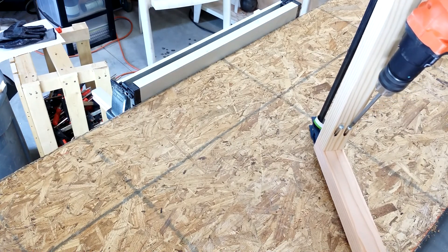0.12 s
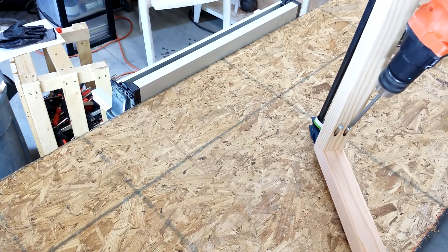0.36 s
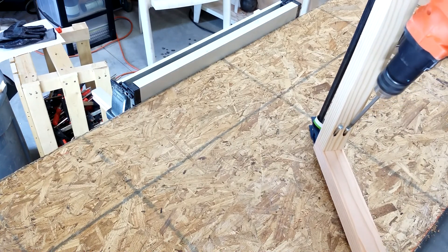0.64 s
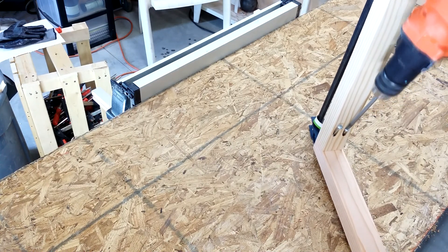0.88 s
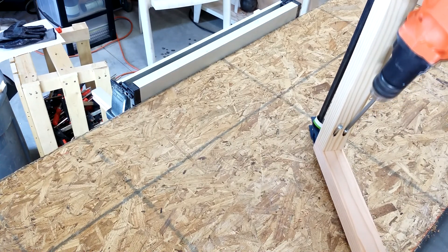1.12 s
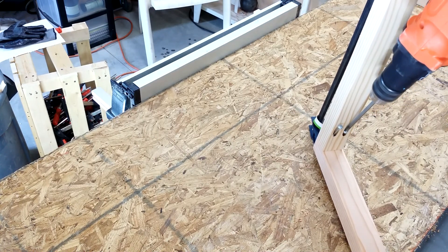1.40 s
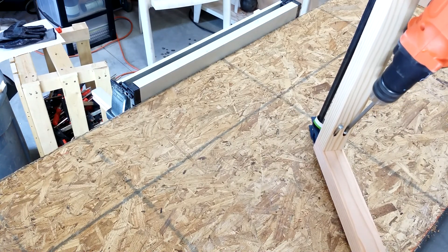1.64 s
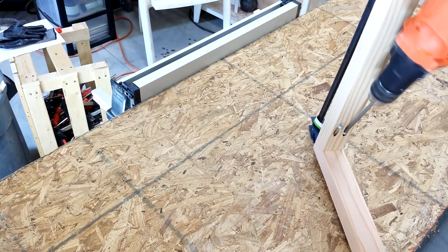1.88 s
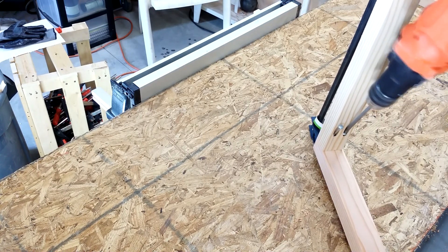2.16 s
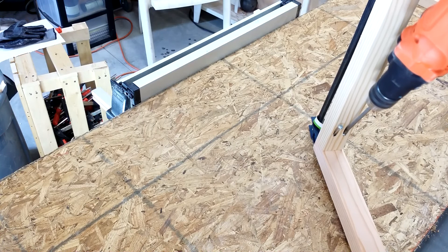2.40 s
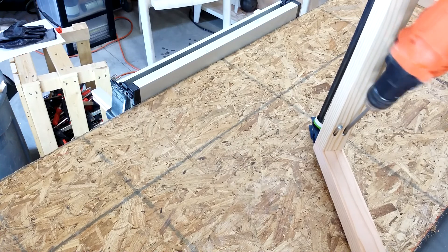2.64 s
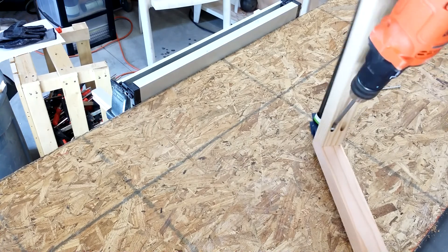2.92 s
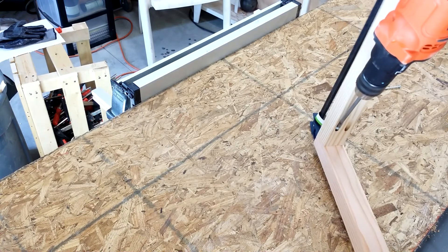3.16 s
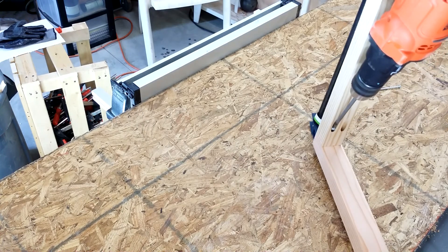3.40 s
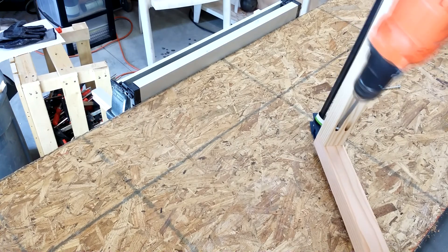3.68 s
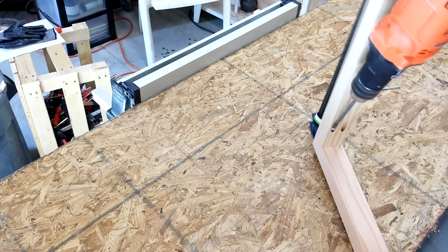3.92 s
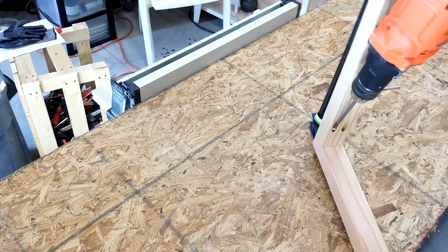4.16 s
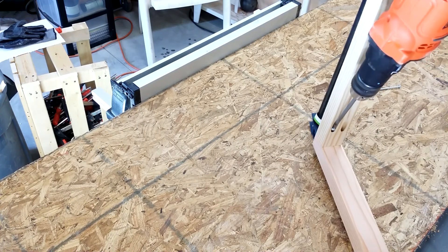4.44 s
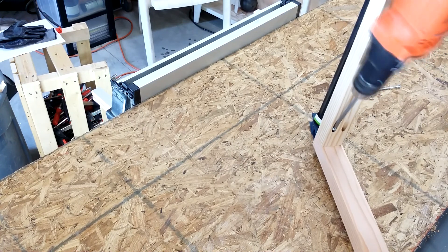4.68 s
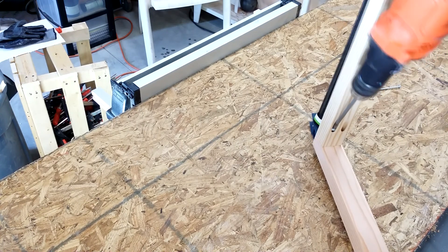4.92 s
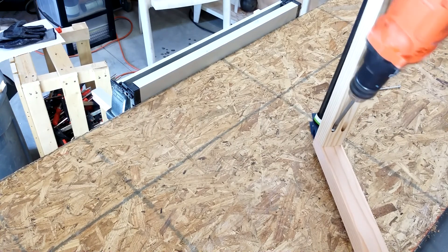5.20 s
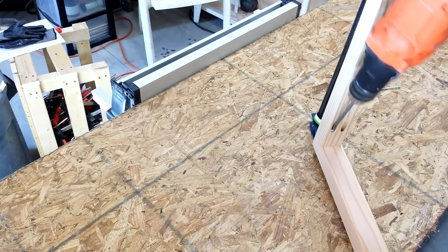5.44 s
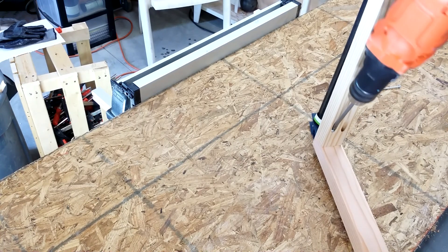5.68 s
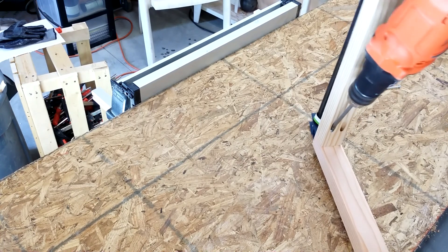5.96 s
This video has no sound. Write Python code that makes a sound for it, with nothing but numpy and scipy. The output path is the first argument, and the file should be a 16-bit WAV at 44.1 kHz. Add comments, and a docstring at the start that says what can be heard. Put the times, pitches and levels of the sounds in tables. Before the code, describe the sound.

A cordless drill is already starting at 0 s, close and to the right, duller on the left. Its grainy rasp and gear whine climb quickly, levelling off around 1 s. The bit slips at about 0.4, 0.7 and 1.4 s: a low thump of the wooden bench, a momentary softening of the gears, then a bright steel click and another thump as it catches. From 1.8 to 2.7 s the slips become a rapid clatter, some eight a second. The motor runs down by 2.9 s, leaving faint room noise, a soft tick and a tiny metallic ping near 3.1 s. A rougher burst with hardly any whine runs from 3.4 to 4.2 s, with three light slips. Small ticks and a fading hum follow. At 4.5 s the drill winds up again, lower and slower, slipping occasionally, then hammering heavily from 5.1 s until it stops abruptly near 6.1 s.

```python
"""Cordless drill at a workshop bench

A cordless drill drives screws into a wooden frame on a board bench, in three bursts, right of a stereo microphone.
Gear-tooth orders whine over a rasp of filtered, grainy noise. Again and again the bit slips out of the
screw head: the bench thumps as a sum of decaying modes and the unloaded gears go quiet, until the bit
snaps back in with a click of noise and ringing steel, and a second thump. Ticks fill the second pause,
sparse reflections follow the tool, and a faint, lumpy room noise lies under it all."""
import sys
import numpy as np
from scipy import signal
from scipy.fft import rfft, irfft, next_fast_len
from scipy.io import wavfile
from scipy.ndimage import uniform_filter1d

SR = 44100
rng = np.random.default_rng(int(sys.argv[2]) if len(sys.argv) > 2 else 0)


def dump(signal):
    """Clip the signal to [-1, 1] and save it as 16-bit WAV at the path in sys.argv[1]."""
    limited = np.clip(np.atleast_2d(signal).T, -1, 1)
    pcm = np.round(limited * 32767).astype(np.int16)
    wavfile.write(sys.argv[1], SR, pcm)


def natural_amplitude(level_db):
    """Convert a level in decibels to a linear amplitude factor, elementwise."""
    exponent = np.asarray(level_db, float) / 20
    return 10 ** exponent


N = 267679

# the bit slips out of the screw head: t/s, thump peak/dB
SLIPS = [(0.3774, -25.5), (0.73, -25), (1.4279, -24.5), (1.7802, -21), (1.9518, -23.5), (2.1184, -25),
         (2.252, -24.5), (2.3728, -25), (2.4883, -25.5), (2.5883, -25), (2.7027, -28.5), (3.6162, -26),
         (3.715, -27), (3.827, -26.5), (4.5284, -36), (4.8321, -24.5), (5.1369, -23), (5.3016, -23.5),
         (5.451, -21), (5.5831, -22), (5.699, -22), (5.8295, -22), (5.9252, -21), (6.0044, -20)]
# the bit drops back in: t/s, thump peak/dB, click level/dB
CATCHES = [(0.4273, -22.5, -19.5), (0.766, -20.5, -16.5), (1.464, -20.5, -17), (1.8193, -25, -21.5),
           (1.9908, -23, -21.5), (2.155, -24.5, -20.5), (2.291, -22.5, -20.5), (2.4083, -24, -20.5),
           (2.5274, -23.5, -22.5), (2.6271, -23, -25), (2.751, -36, -29), (3.457, -45, -30),
           (3.698, -34.5, -22), (3.8045, -32, -24.5), (3.9238, -30, -27), (4.6563, -35, -25),
           (4.8954, -31, -21.5), (5.1883, -26, -25), (5.3523, -25, -19.5), (5.4957, -22.5, -17),
           (5.6282, -26, -21), (5.745, -27, -22), (5.875, -28, -21), (5.9806, -26.5, -21.5)]
# modes of the board bench: f/Hz, level before any tilt/dB, t60/s, signed swing of the board at the microphone
BENCH_MODES = [(97.3, -7.5, 0.15, 0.96), (141.9, -1.5, 0.23, -0.57), (192.6, -3.5, 0.15, -0.47),
               (243.2, 7.5, 0.15, 0.13), (301, -14, 0.2, 0.54), (375, -16.5, 0.12, -0.53),
               (414.7, -24, 0.2, 0.92), (510, -17, 0.046, -0.72)]
# the screw sits deep and tight: from t/s, to t/s
TIGHT_SPANS = [(1.78, 2.55), (5.3, 6.2)]
TURN_TEETH = 24  # teeth that meet in one turn of the shaft


def evened(x):
    """Scales x to rms 1."""
    return x / np.sqrt(np.mean(x ** 2) + 1e-20)


def read(points, hz):
    """Reads a curve of (Hz, value) points along a logarithmic frequency axis."""
    f, value = np.transpose(points)
    return np.interp(np.log(hz + 1), np.log(f + 1), value)


def coloured(x, gain):
    """Filters x by a gain given as a function of frequency."""
    size = next_fast_len(N + 4096)
    hz = np.arange(size // 2 + 1) * SR / size
    return irfft(rfft(x, size) * gain(hz), size)[..., :N]


def drift(hz):
    """Slow random wander of rms 1, rolled off above hz."""
    return evened(coloured(rng.standard_normal(N), lambda f: 1 / (1 + (f / hz) ** 2)))


def during(spans, t):
    """1 inside the spans, 0 outside."""
    return sum((t >= a) * (t < b) for a, b, *_ in spans) * 1.


def blows(s, db):
    """A train of single impulses."""
    train = np.zeros(N)
    np.add.at(train, (np.asarray(s) * SR).astype(int), natural_amplitude(db))
    return train


def ring(modes, force_s, tilt_db=0):
    """Modes let go from a bent shape over force_s; tilt_db per octave above 200 Hz favours the treble. Peak 1."""
    t = np.arange(SR // 3) / SR
    body = 0
    for hz, db, t60, way in modes:
        level_db = db + tilt_db * np.log2(hz / 200) - 60 * t / t60
        body = body + way * natural_amplitude(level_db) * np.cos(2 * np.pi * hz * t)
    body = np.convolve(body, np.hanning(int(force_s * SR) + 3))
    return body / abs(body).max()


def hush():
    """The faint, lumpy background of the room: noise partly shared by both ports, its level wandering."""
    # spectrum of the room noise: f/Hz, relative density/dB
    room = [(18, -29), (30, 2), (124, 4), (295, -12), (437, -3.5), (1960, -26.5), (8520, -33.5),
            (14800, -30.5), (16000, -30)]
    shared, left, right = rng.standard_normal((3, N))
    noise = np.array([shared + .6 * left, shared + 1.1 * right])
    noise = coloured(noise, lambda f: natural_amplitude(read(room, f)))
    return natural_amplitude(-77.5 + 1.5 * drift(25)) * evened(noise)


def trigger(t):
    """Gains of rasp, whine and brightness: each pull swells in, holds, and runs down to a standstill."""
    # pulls: start t/s, standstill t/s, run-down/s, bend of the run-down, rasp level/dB, whine over rasp/dB
    bursts = [(-.012, 2.862, 0.22, 0.53, -32, -2.5), (3.437, 4.212, 0.26, 1.73, -33, -30),
              (4.485, 6.09, 0.11, 0.79, -32.5, -2.5)]
    # the motor creeps on after the second pull: from t/s, to t/s, level/dB, slope/(dB/s)
    creep = (4.08, 4.46, -57, -62)
    spin_up_s = 0.13  # time constant
    rasp, whine, bright = np.zeros(N), np.zeros(N), np.ones(N)
    for start, still, down_s, bend, rasp_db, whine_db in bursts:
        down = np.clip((still - t) / down_s, 0, 1) ** bend
        run = (1 - np.exp(-np.maximum(t - start, 0) / spin_up_s)) * down
        rasp += natural_amplitude(rasp_db) * run
        whine += natural_amplitude(rasp_db + whine_db) * run
        bright[t > start] = np.maximum(down, .1)[t > start]
    start, end, db, db_per_s = creep
    creep_db = db + db_per_s * np.clip(t - start, 0, end - start)
    return rasp + during([creep], t) * natural_amplitude(creep_db), whine, bright


def unloading(fall_s, back_s):
    """dB curve: off the screw the gears die down over fall_s, after the catch they return over back_s."""
    quiet_loose_db, quiet_tight_db = -6.5, -9  # deeper where the screw sat tight
    t, out = np.arange(N) / SR, np.zeros(N)
    caught = np.transpose(CATCHES)[0]
    for s, _ in SLIPS[:-1]:  # at the last slip the motor is already running down
        end = caught[caught > s][0]
        quiet_db = quiet_tight_db if during(TIGHT_SPANS, s) else quiet_loose_db
        fall = 1 - np.exp(-np.clip(t - s, 0, end - s) / fall_s)
        out += quiet_db * fall * np.exp(-np.maximum(t - end, 0) / back_s)
    return out


def gear_whine(t, loaded_hz, teeth, shaft):
    """Harmonics of the tooth meeting rate, stronger under load, radiated unevenly by the gearbox."""
    # tooth orders 1 to 10: level before the gearbox and the bite of the screw/dB
    order_db = [-6, -6.5, -5.5, -11.5, -7, -15, -18, -15, -22, -19]
    # how well the gearbox radiates its whine: f/Hz, gain/dB
    gearbox = [(700, -25), (930, -11), (1020, -4), (1250, -11), (1500, 1), (1800, -1), (2150, 3.5),
               (2600, 2), (2880, 1), (2970, -7), (3300, -3), (3700, 7), (4200, 2), (4550, 6), (5100, -1),
               (5800, -3), (6800, 0), (7500, 6), (8000, -3), (9200, 9), (9700, 2), (11000, 8), (11450, 9),
               (11800, -4), (16000, -15)]
    wobble = .11 * np.sin(shaft) + .04 * np.sin(2 * shaft + 1.3)  # an off-centre gear: sidebands a turn apart
    tight = uniform_filter1d(during(TIGHT_SPANS, t), int(.12 * SR))  # eased over 0.12 s
    whine = 0
    for k, db in enumerate(order_db, 1):
        bite_db = -8 if k in (3, 5) else 2.5  # a tight screw weakens orders 3 and 5, lifts the others
        level_db = db + bite_db * tight + 1.8 * drift(30)
        if k == 3:  # the third order only speaks up at speed, by 11 dB an octave
            level_db = level_db + 11 * np.log2(loaded_hz / 1450)
        whine = whine + natural_amplitude(level_db) * np.cos(k * (teeth + wobble))
    whine = whine * natural_amplitude(1.8 * unloading(0.005, 0.014))  # the teeth sing under load
    whine = whine * natural_amplitude(1.5 * np.log2(loaded_hz / 1200))  # 1.5 dB per octave of speed
    return coloured(whine, lambda f: natural_amplitude(read(gearbox, f)))


def housing(hz):
    """Gain of the drill's shell resonances: bells summed in dB."""
    # shell resonances: f/Hz, width/Hz, gain over the rasp/dB
    shell = [(1090, 330, 9), (1840, 1250, 4.5), (2820, 310, 0), (4684, 410, 8.5), (6070, 225, 7),
             (7140, 130, -6), (9080, 490, 8.5), (10870, 900, 4.5), (12900, 600, -0.5)]
    return natural_amplitude(sum(db / (1 + (2 * (hz - f) / width) ** 2) for f, width, db in shell))


def shell_rasp(both, own, loaded_hz, shaft, bright):
    """Grainy noise throbbing once a turn, through the shell; its treble follows speed, load and run-down."""
    # rasp before the shell resonances: f/Hz, relative density/dB
    rasp_curve = [(24, -51.5), (40, -18.5), (237, -12.5), (412, -6.5), (810, -15.5), (1020, -12.5),
                  (1240, -12.5), (2000, -2.5), (3380, -0.5), (4570, -3), (7730, -4.5), (11300, -7),
                  (16000, -5.5)]
    throb = natural_amplitude(0.19 * np.cos(shaft) + 1.01 * drift(60))
    # above some 400 Hz each port also hears its own side of the shell
    sides = coloured(np.array(own), lambda f: 1 / (1 + (400 / (f + 1)) ** 4))
    grit = throb * (both + 1.05 * sides)
    rasp = evened(coloured(grit, lambda f: housing(f) * natural_amplitude(read(rasp_curve, f))))
    dull = coloured(rasp, lambda f: 1 / (1 + (f / 8000) ** 4))
    free_db = unloading(0.048, 0.0049)
    top_db = 2.9 * free_db + 4.2 * np.log2(loaded_hz / 1200)  # the top grows with speed and dies down most
    rasp = dull * natural_amplitude(free_db) + (rasp - dull) * natural_amplitude(top_db)
    low = coloured(rasp, lambda f: 1 / (1 + (f / 3000) ** 4))
    return low + (rasp - low) * bright  # running down, the part above 3 kHz fades faster


def shaft_hum(shaft):
    """Low harmonics of the shaft's turning rate."""
    # shaft orders 2 to 5: amplitude over the rasp/dB
    order_db = [-33.5, -29.5, -54, -40.5]
    return sum(natural_amplitude(db) * np.sin(k * shaft) for k, db in enumerate(order_db, 2))


def bench_rumble(both, running, t):
    """The running tool shakes the bench: its noise excites the bench modes."""
    # the bench keeps humming in the second pause: from t/s, to t/s, level before the rumble gain/dB, slope/(dB/s)
    hum_on = (4.0, 8, -29, -29)
    rumble = evened(signal.oaconvolve(both, ring(BENCH_MODES, 0.00055, tilt_db=4.0))[:N])
    start, _, hum_db, slope_db = hum_on
    humming = during([hum_on], t) * natural_amplitude(hum_db + slope_db * (t - start))
    return rumble * natural_amplitude(-30) * np.maximum(running, humming)


def drill():
    """Tooth and shaft orders turn with the motor over a grainy rasp and the rumble of the bench."""
    # gear teeth meeting per second under load: t/s, f/Hz
    speed = [(0, 443.6), (.14, 613.8), (.21, 770), (.3, 933.5), (.38, 1056), (.48, 1219), (.6, 1302),
             (.73, 1371), (.82, 1428), (1.0, 1474), (1.2, 1496), (1.5, 1497), (1.76, 1439), (2.5, 1405),
             (2.56, 1403), (2.69, 1106), (2.87, 705), (4.52, 504), (4.68, 654.5), (4.82, 735.2),
             (4.9, 885.7), (5.15, 946.6), (5.22, 1000), (5.4, 1037), (5.7, 1084), (5.82, 1075), (6.07, 908)]
    t = np.arange(N) / SR
    running, singing, bright = trigger(t)
    loaded_hz = np.interp(t, *np.transpose(speed))
    # it races while free, the load drags it back
    hz = loaded_hz * (1 - .004 * unloading(.03, .06) + .002 * drift(40))
    teeth = 2 * np.pi * np.cumsum(hz) / SR
    shaft = teeth / TURN_TEETH
    grain = natural_amplitude(3.44 * np.minimum(rng.exponential(1, N), 4))  # random level from sample to sample
    both, *own = rng.standard_normal((3, N)) * grain
    rasp = shell_rasp(both, own, loaded_hz, shaft, bright)
    whine = gear_whine(t, loaded_hz, teeth, shaft)
    return running * (rasp + shaft_hum(shaft)) + singing * whine + bench_rumble(both, running, t)


def bench():
    """The slip lets the push go; as the bit drops back in, the push returns, sharper and the other way."""
    s, thump_db = np.transpose(SLIPS)
    release = signal.oaconvolve(blows(s - .001, thump_db), ring(BENCH_MODES, 0.0017))[:N]
    s, thump_db, _ = np.transpose(CATCHES)
    push = ring(BENCH_MODES, 0.00038, tilt_db=2.0)
    return release - signal.oaconvolve(blows(s - .0025, thump_db), push)[:N]


def clicks():
    """Steel on steel: a crack of noise and the short ring of the bit, a little different each time."""
    # modes of the bit before their random spread: f/Hz, level before any tilt/dB, t60/s
    bit = [(1160, -9.5, 0.005), (2260, -6.5, 0.0013), (3620, -4.5, 0.01), (4620, -2.5, 0.0028),
           (6000, -2.5, 0.0099), (7240, -6, 0.0093), (9400, -3.5, .01)]
    # the chuck and gears ticking over slowly, and the trigger: t/s, level/dB
    ticks = [(2.9102, -73), (3.1012, -68), (3.4434, -43.5), (4.072, -36.5), (4.086, -37), (4.1104, -53.5),
             (4.156, -76), (4.1998, -79.5), (4.228, -54), (4.2607, -58.5), (4.2854, -57.5), (4.3214, -65),
             (4.36, -80), (4.4734, -51), (4.4987, -43.5), (4.5098, -62), (4.5264, -43)]
    out, t = np.zeros(N + SR), np.arange(600) / SR
    # the bit strikes home 1.5 ms after the catch; the ticks are softer, by -7 dB an octave
    hits = [(s + .0015, db, 0) for s, _, db in CATCHES] + [(s, db, -7.0) for s, db in ticks]
    for s, db, tilt_db in hits:
        modes = []
        for (hz, mode_db, t60), (a, b) in zip(bit, rng.standard_normal((len(bit), 2))):
            modes.append((hz * (1 + 0.054 * a), mode_db + 2.0 * b, t60, np.sign(a)))
        steel = ring(modes, .0001, tilt_db)
        crack = uniform_filter1d(rng.standard_normal(600), size=3) * natural_amplitude(-3.0 - 60 * t / 0.033)
        steel[:600] += crack - uniform_filter1d(crack, size=30)  # no bass in it
        out[int(s * SR):][:len(steel)] += natural_amplitude(db) * steel
    return out[:N]


def ping():
    """A small metal part rings once as a single decaying mode."""
    # the one ring: t/s, f/Hz, level/dB, t60/s
    small_part = (3.106, 4060, -78, .2)
    s, hz, db, t60 = small_part
    tone = natural_amplitude(db) * ring([(hz, 0, t60, 1)], .0001)
    out = np.zeros(N)
    out[int(s * SR):][:len(tone)] += tone
    return out


def workshop(x, t60=0.067):
    """Sparse reflections off bench and walls, other ones for each side."""
    # reflections relative to the direct sound: f/Hz, level/dB
    echo = [(300, -30), (700, -10), (16000, -10)]
    taps = np.zeros((2, SR // 4))
    at = np.arange(40, SR // 4 - 20, 20)  # one tap at random in every 20 samples
    at = at + rng.integers(0, 20, (2, len(at)))
    np.put_along_axis(taps, at, rng.choice([-1., 1.], at.shape), 1)
    taps *= natural_amplitude(-60 * np.arange(SR // 4) / SR / t60)
    wet = signal.oaconvolve(x, taps / np.linalg.norm(taps[0]), axes=1)[:, :N]
    return coloured(wet, lambda f: natural_amplitude(read(echo, f)))


def scene():
    """The tool stands to the right: the left port hears it later and duller."""
    # left port over right: f/Hz, level/dB
    left_db = [(60, -.6), (250, -.6), (500, -2.6), (2000, -2.4), (4000, -2.6), (8000, -8), (15000, -9)]
    # phase lead of the left port, negative where it lags: f/Hz, phase/rad
    left_lead = [(0, 0), (350, -.35), (650, -.6), (1000, -2.3), (1750, -2.5), (2150, -1.2), (2600, -.8),
                 (3250, -3.1), (3700, -4.4), (4600, -5.1), (7240, -7.2), (16500, -16.2)]
    tool = drill() + bench() + clicks() + ping()
    hz, lead = np.transpose(left_lead)
    side = np.array([[.5], [-.5]])  # half the difference to each port

    def port(f):
        return natural_amplitude(side * read(left_db, f)) * np.exp(1j * side * np.interp(f, hz, lead))

    return coloured(tool, port) + workshop(tool) + hush()


def roll_off(x):
    """The treble ends steeply here."""
    return signal.sosfilt(signal.butter(12, 16970, fs=SR, output="sos"), x)


def record(dry):
    """The microphone drops the deep bass below 45 Hz; then the band ends at 15.95 kHz."""
    thin = signal.sosfilt(signal.butter(2, 45, "high", fs=SR, output="sos"), dry)
    thin = coloured(thin, lambda f: f < 15950)
    return roll_off(thin)


dry = scene()
out = record(dry)
dump(out)
```